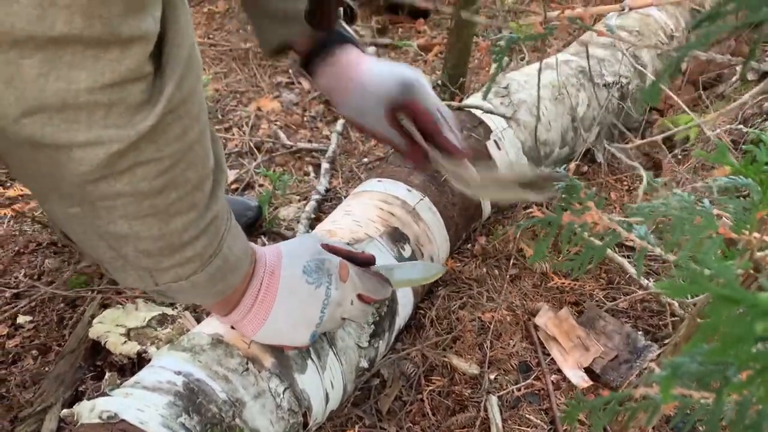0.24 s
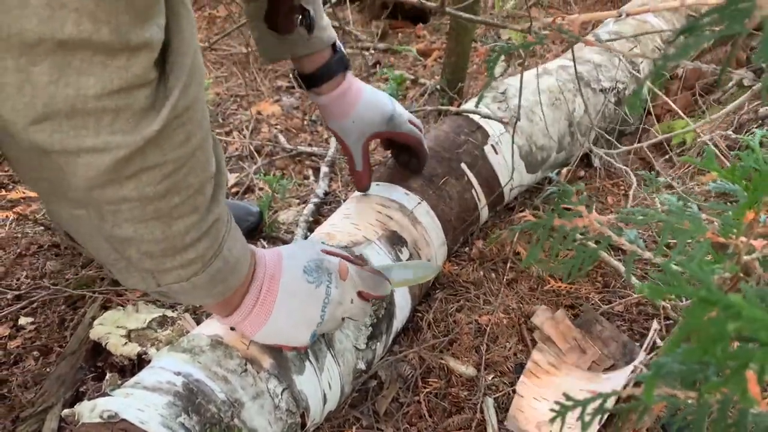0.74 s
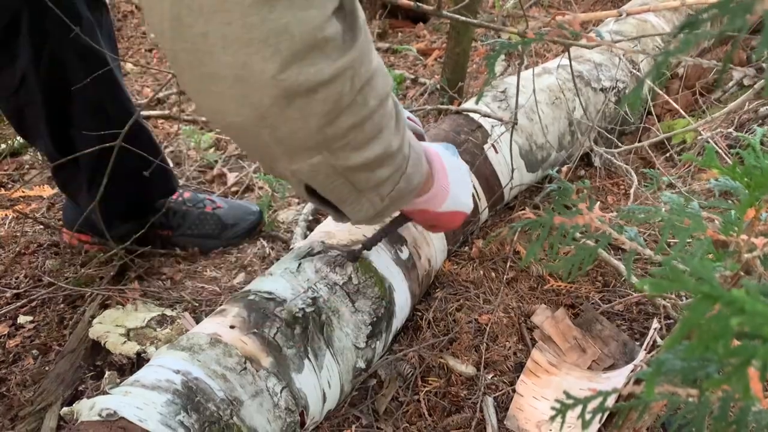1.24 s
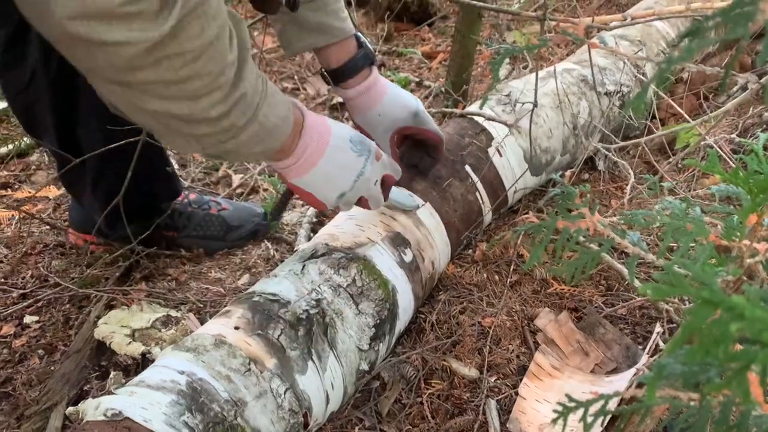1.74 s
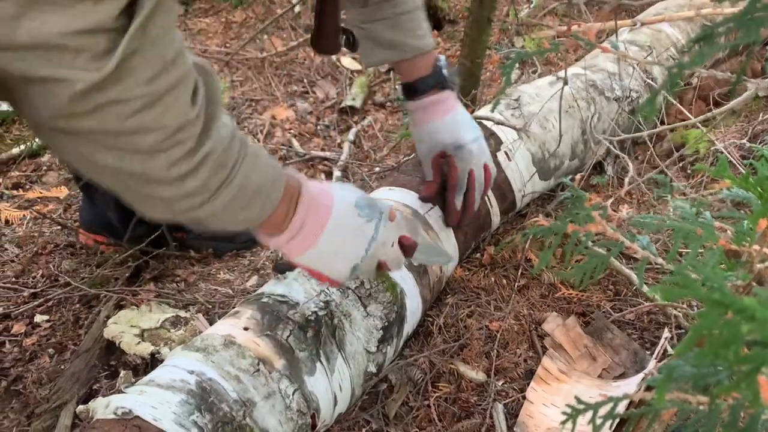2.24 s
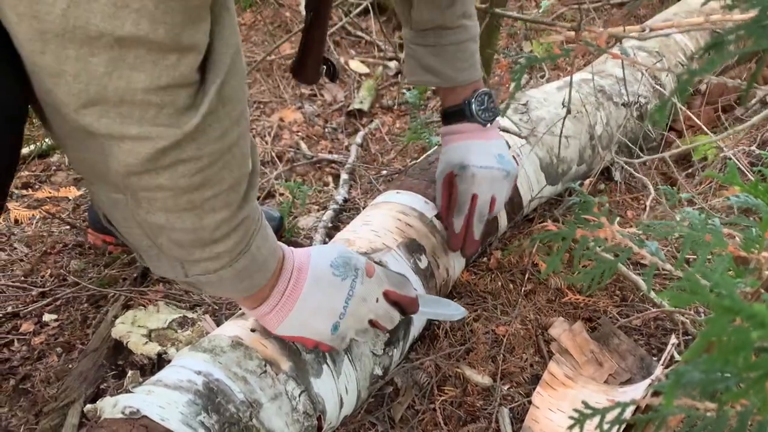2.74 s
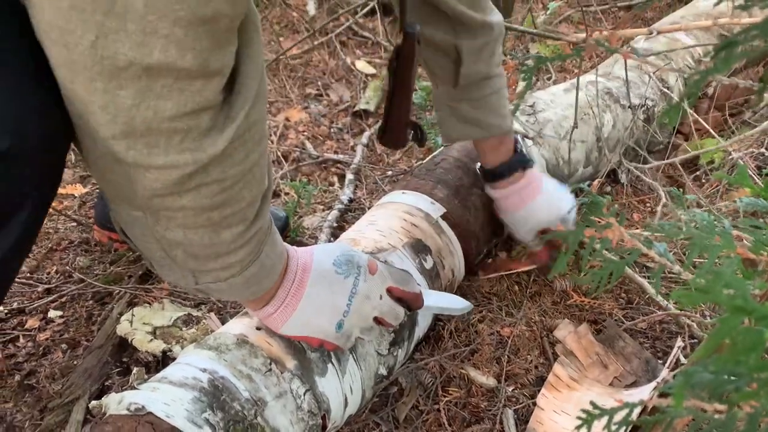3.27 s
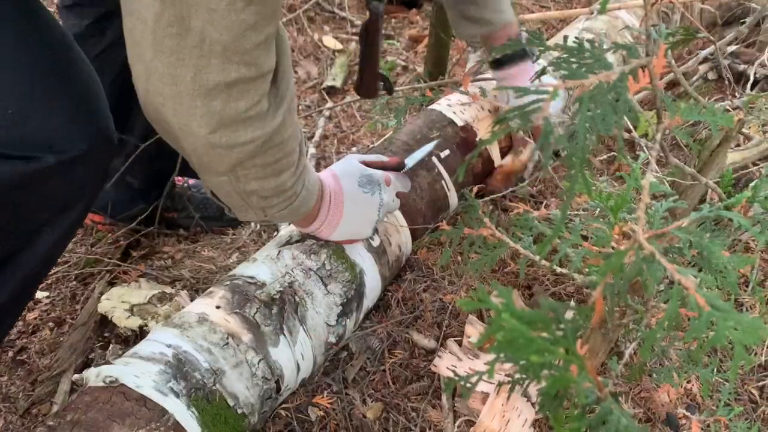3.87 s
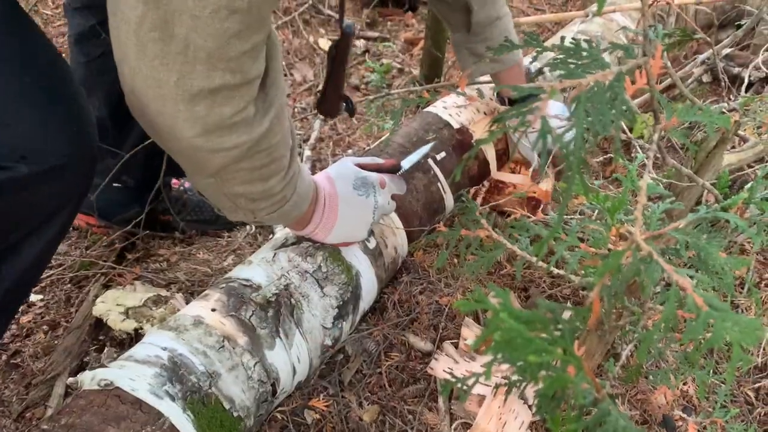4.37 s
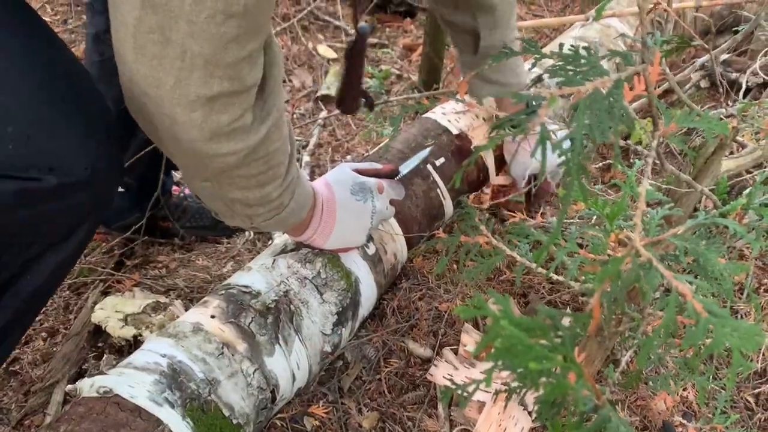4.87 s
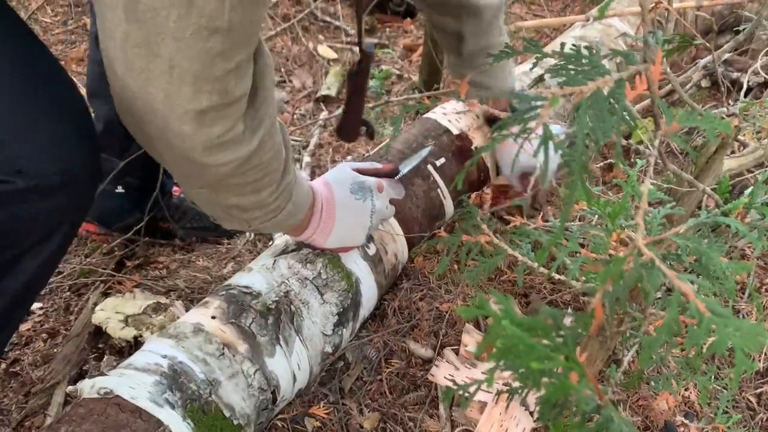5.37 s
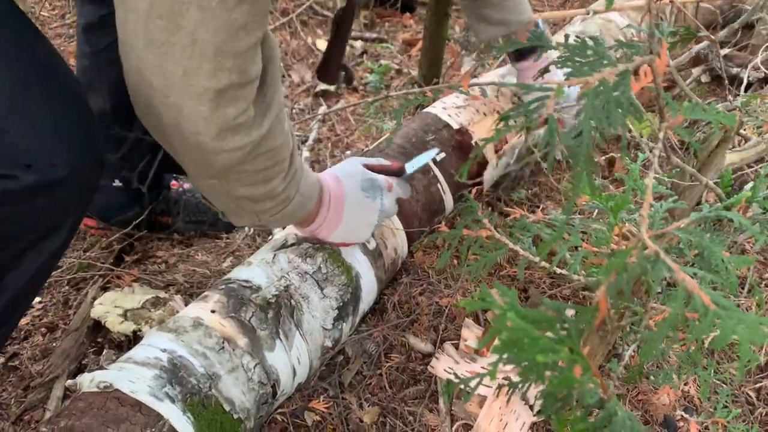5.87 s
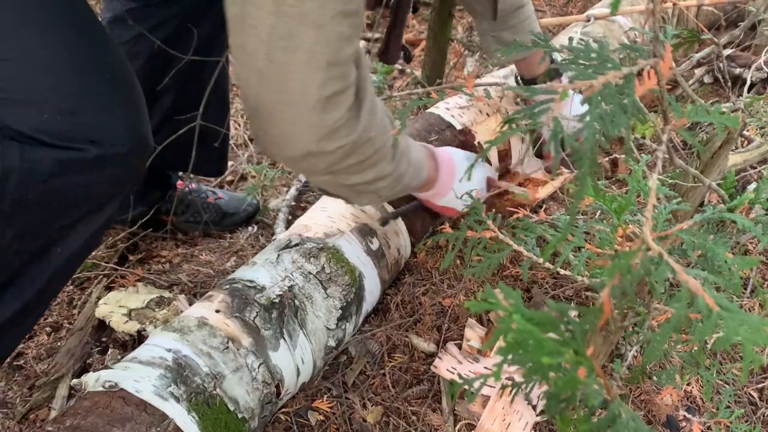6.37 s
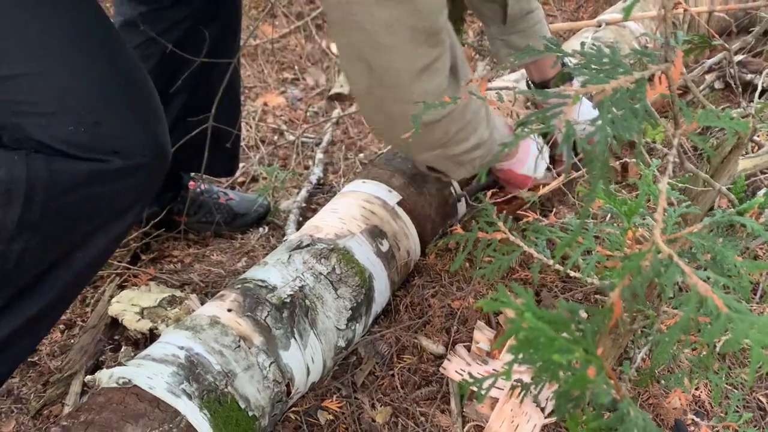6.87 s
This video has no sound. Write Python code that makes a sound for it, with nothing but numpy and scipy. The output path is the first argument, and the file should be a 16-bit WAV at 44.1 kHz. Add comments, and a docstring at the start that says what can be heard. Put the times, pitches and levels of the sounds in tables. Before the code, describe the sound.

Close up in a quiet forest, dry birch bark is cut and stripped from a log by hand. Brief blade scrapes and scattered clicks come first, separated by pauses. The peeling then grows busier, with bright crackling, splintering snaps and dull wooden knocks as the log is tugged. After a short lull come three last loud rips. Wind is barely audible underneath, and there is almost no echo.

```python
"""Gloved hands cut birch bark with a knife and peel it from a fallen log in a quiet forest.
First come short scrapes and sparse snaps, with a sharp crack near 1.9 s. Rubbing and tearing crackle;
each snapping fibre sends a falling chirp through the curled sheet and thumps the log. From 3.8 to
5.5 s the snaps crowd together and hard tugs rock the log. The last strong bursts come near 6.2, 6.5
and 7 s. Faint wind lies under it all, and the recorder adds its own stereo colouring."""
import sys
import numpy as np
from scipy import signal
from scipy.fft import rfft, irfft, next_fast_len
from scipy.io import wavfile
from scipy.ndimage import uniform_filter1d, map_coordinates

SR = 44100
rng = np.random.default_rng(int(sys.argv[2]) if len(sys.argv) > 2 else 0)


def bounce(signal):
    """Save signal as a 16-bit WAV file at the path given by the first command-line argument."""
    frames = np.transpose(np.atleast_2d(signal))
    limited = np.clip(frames, -1, 1)
    pcm = np.round(limited * 32767).astype(np.int16)
    wavfile.write(sys.argv[1], SR, pcm)


N = 313992

# Pulls and scrapes of blade and gloves, before each layer's own trim:
# (start [s], length [s], crackle [dB], rustle over crackle [dB], scrape over crackle [dB])
PULLS = [(.09, 0.11, -45.5, -9, -2.5), (0.391, 0.046, -47, -4, 7), (.842, 0.024, -48, -6.5, -5),
         (.895, 0.0094, -54, -12, -11), (1.0, 0.11, -72, -4, 1), (1.329, 0.11, -77, 8.5, 11.5),
         (1.553, 0.0036, -60.5, -7.5, -9), (1.798, 0.1, -61.5, 7, 8), (2.11, 0.029, -61.5, -6.5, 1),
         (2.265, 0.055, -57, -6, -3), (2.38, 0.046, -59, -5.5, -2), (2.47, .015, -46, -16.5, -12),
         (2.74, 0.074, -64.5, -2.5, 2.5), (2.986, .075, -57, -6.5, 7), (3.078, 0.071, -54.5, -7.5, -2.5),
         (3.234, 0.049, -49.5, -8, -8.5), (3.338, 0.066, -50, -7.5, -6), (3.631, 0.065, -59.5, -6, -0.5),
         (3.781, .19, -45, -14.5, -8.5), (3.817, 0.014, -38.5, -4.5, -1), (3.987, 0.011, -40.5, -13, -10),
         (4.024, 0.051, -50, 0, -8), (4.1, 0.13, -59, -10, -21), (4.335, 0.059, -59, 4, -10),
         (4.428, 0.076, -47.5, -5, -8), (4.54, 0.062, -53.5, -7.5, -5), (4.773, 0.094, -44.5, -1, -3),
         (4.987, 0.12, -54, -4.5, -6.5), (5.172, 0.091, -50, 1, -4.5), (5.358, 0.049, -46, 1, -3.5),
         (5.664, .145, -49.5, -7.5, -6.5), (5.898, 0.018, -47.5, -5.5, -1), (5.999, .02, -51, -6.5, 2),
         (6.095, 0.014, -57, -3.5, -2), (6.217, 0.024, -40.5, -8.5, -6), (6.359, 0.11, -64.5, -3.5, 4),
         (6.471, 0.079, -48.5, -1, -5.5), (6.89, 0.097, -61.5, -5.5, -12), (7.004, 0.065, -45, -8.5, -6.5)]
# Gloves and sleeves shifting on the bark between strokes: (time [s], crackle [dB])
GLOVE_LEVELS = [(0, -51), (.3, -57.5), (.5, -59.5), (.68, -75.5), (.81, -59), (.96, -79), (1.25, -92),
                (1.45, -72), (1.75, -73), (1.95, -62), (2.6, -64), (2.92, -77.5), (3.2, -58), (3.55, -66.5),
                (4.7, -65), (5.9, -58.5), (6.75, -73.5), (7.12, -58)]
# Tone of the tearing papery layers: (frequency [Hz], level [dB])
CRACKLE_TONE = [(2500, -46.5), (5000, -1), (6400, -3), (8500, 2), (10500, 0), (13500, -1), (15500, -3.5),
                (17000, -19.5)]
# Tone of the hollow sheet: (frequency [Hz], level [dB])
RUSTLE_TONE = [(40, -34.5), (100, -13.5), (250, -7), (380, 1.5), (700, 0), (1150, -2), (1600, -10),
               (2600, -35), (5000, -59)]
# Tone of the scraped surface: (frequency [Hz], level [dB])
SCRAPE_TONE = [(700, -25.5), (1400, -2.5), (1900, 1), (2700, 0), (3600, 1), (5500, -8.5), (7500, -20),
               (12000, -45.5)]
# Fibres breaking: (time [s], crack [dB], splinter [dB], sheet pitch [Hz], sheet [dB])
FIBRE_BREAKS = [(.238, -41.5, -51, 1220, -66), (.253, -45.5, -65, 1260, -75), (0.384, -41, -45, 1550, -63),
                (.4684, -45.5, -39, 1400, -42.5), (.6455, -63, -68, 1200, -83),
                (.8533, -35.5, -52, 775, -51.5), (0.8701, -38.5, -48.5, 1150, -44),
                (.9722, -62, -73, 1200, -78), (1.3368, -66, -50.5, 1220, -50), (1.429, -75, -66, 1010, -65),
                (1.558, -49, -49.5, 1240, -51), (1.8479, -45, -44, 970, -58), (1.8812, -47, -44, 1050, -45),
                (1.8844, -27, -25.5, 787, -36), (1.9702, -65.5, -66, 785, -57),
                (2.1763, -73.5, -71, 770, -60), (2.245, -49, -67, 1370, -72),
                (2.2841, -38.5, -61, 1050, -66), (2.302, -55.5, -72, 810, -54.5),
                (2.3857, -45, -63, 960, -66), (2.3914, -37, -50, 1130, -48.5),
                (2.4696, -38, -53, 1000, -65), (2.474, -46, -45.5, 920, -55),
                (2.5253, -50.5, -59.5, 1120, -68), (2.6807, -56, -63.5, 1010, -51.5),
                (3.117, -49.5, -51.5, 870, -69), (3.1442, -56, -53, 1400, -57),
                (3.1946, -42, -55.5, 910, -70), (3.211, -31, -42, 1270, -50.5), (3.239, -38, -48, 900, -58),
                (3.2536, -36, -47, 855, -57), (3.325, -48, -52, 1200, -59.5),
                (3.398, -49, -52.5, 1230, -74), (3.8253, -36, -45.5, 1150, -38.5),
                (3.8325, -33, -43, 1060, -40.5), (3.9159, -35.5, -44, 1520, -61),
                (3.9951, -35.5, -45, 705, -48), (4.0022, -34, -42, 765, -49), (4.02, -32, -37, 970, -34.5),
                (4.0671, -42.5, -49.5, 910, -37), (4.1642, -29.5, -42, 1170, -44.5),
                (4.183, -43.5, -54, 820, -59), (4.2127, -42.5, -53, 1130, -54.5),
                (4.227, -29.5, -44.5, 830, -51.5), (4.2978, -41, -54, 810, -45.5),
                (4.4284, -43, -48, 880, -47), (4.4641, -38.5, -37.5, 870, -41.5),
                (4.5401, -44.5, -46, 1090, -58), (4.6573, -58.5, -54, 1240, -54.5),
                (4.784, -28.5, -42.5, 825, -44.5), (4.7889, -39.5, -40.5, 1100, -39),
                (4.8003, -29.5, -42, 1140, -37), (4.8301, -36.5, -49, 1030, -47),
                (4.841, -40.5, -60, 1050, -46), (4.8517, -35, -44, 1080, -39.5),
                (4.8718, -46, -52.5, 990, -40.5), (4.9021, -40, -54, 1006, -47.5),
                (4.9727, -47, -63, 1080, -61), (4.9956, -41, -49.5, 1150, -44),
                (5.0409, -42.5, -50.5, 980, -45), (5.0539, -35, -51.5, 1200, -51),
                (5.0566, -28.5, -50, 1160, -32.5), (5.0672, -23.5, -37.5, 1080, -40),
                (5.08, -34.5, -49, 1480, -40.5), (5.1629, -42, -67, 970, -55), (5.184, -45, -60, 740, -41),
                (5.268, -44, -51, 990, -41.5), (5.3496, -45, -60, 825, -48), (5.3802, -42, -44.5, 800, -42),
                (5.3907, -35.5, -42, 1010, -40), (5.5285, -48, -49, 790, -50),
                (5.9119, -44.5, -45.5, 1040, -43), (5.955, -43.5, -47, 1180, -55.5),
                (6.1755, -40, -46, 1670, -38.5), (6.21, -41, -42, 1160, -49),
                (6.2253, -27, -30.5, 1100, -28.5), (6.246, -37.5, -41, 840, -41),
                (6.332, -37.5, -44.5, 786, -39), (6.3575, -44.5, -60, 850, -64),
                (6.458, -31, -43, 1220, -46), (6.4729, -37.5, -51.5, 810, -47),
                (6.5008, -49, -42, 1050, -46.5), (6.5106, -33, -48.5, 890, -53),
                (6.5142, -40.5, -43.5, 820, -41), (6.5277, -30, -36, 800, -46.5),
                (6.5455, -45.5, -48, 990, -51), (6.6621, -50.5, -54.5, 970, -49),
                (7.0, -42.5, -53, 1066, -65), (7.014, -28, -43, 1050, -54), (7.0287, -24, -34, 1020, -35.5),
                (7.0691, -38, -39, 680, -43.5)]
# An edge juddering over the bark: (middle [s], half length [s], pitch [Hz], ring [dB], crackle [dB])
JUDDERS = [(0.108, 0.0031, 2620, -30.5, -37), (0.137, 0.0059, 2580, -39.5, -43),
           (0.161, 0.024, 2580, -48.5, -44.5), (0.215, 0.0066, 3030, -45, -35.5),
           (0.6, 0.14, 3850, -67, -94), (1.39, 0.085, 2740, -72, -84), (1.808, 0.017, 2890, -49.5, -77),
           (1.843, 0.027, 2030, -51, -57.5), (1.854, .015, 2530, -44.5, -48.5),
           (3.026, 0.022, 1970, -46.5, -51), (3.825, .012, 1920, -41.5, -48.5),
           (6.014, .006, 3100, -48.5, -60.5)]
# Hand and knife bumping the log: (time [s], knock [dB], thud [dB])
LOG_BUMPS = [(.3835, -58, -53), (0.4678, -42.5, -46), (1.3372, -50, -62.5), (1.8842, -40, -46),
             (1.9695, -58.5, -65), (2.3026, -57, -70), (2.3914, -55.5, -64), (3.2535, -44.5, -49.5),
             (3.325, -59, -55), (3.3638, -60, -52.5), (3.8248, -42, -62), (4.0669, -47, -44),
             (4.2981, -49.5, -47), (4.4268, -44.5, -44), (4.466, -33.5, -38.5), (4.7887, -41.5, -60),
             (4.8519, -46.5, -64), (5.0666, -37, -47.5), (5.184, -48, -74), (5.3808, -32, -46),
             (5.3917, -43, -38.5), (5.5289, -54, -61), (6.246, -54, -61), (6.3319, -44, -53),
             (6.458, -40.5, -53), (6.5016, -45, -49), (6.6626, -47.5, -53.5), (7.0365, -35.5, -45.5),
             (7.0687, -44, -52)]
# Tone of the log thudding on soft ground: (frequency [Hz], level [dB])
THUD_TONE = [(20, -45.5), (32, -29), (50, -9.5), (80, -7), (130, 1.5), (220, -1.5), (330, -7.5), (700, -47)]
# Hard tugs that rock the whole log: (time [s], pitch [Hz], level [dB])
TUGS = [(0.483, 72, -49), (1.892, 79.5, -77), (3.26, 88, -47), (3.38, 67, -42), (4.317, 108, -50),
        (4.473, 103, -49), (5.074, 84.6, -39), (5.406, 84, -33.5)]
# Echo among the trees: (frequency [Hz], time to fade by 60 dB [s])
ECHO_TIMES = [(100, 0.16), (1000, 0.17), (3500, 0.18), (8000, 0.12), (16000, .12)]
# Tone of the far wind: (frequency [Hz], level [dB])
WIND_TONE = [(20, -23), (40, -10), (65, 1), (120, -6), (300, -11), (1000, -14.5), (2500, -14),
             (6000, -19.5), (16000, -30.5)]
# The recorder's stereo colouring, in phase: (frequency [Hz], left minus right [radians])
STEREO_PHASE = [(0, 0.4), (400, -0.05), (1100, 0.5), (1850, -1.5), (2760, 2.03), (4400, 0.33), (5300, 2.5),
                (6000, 0.62), (7000, 0.3), (8000, -1.94), (8700, -2.5), (10300, -7), (11900, -10),
                (13400, -12), (15100, -17), (16500, -17)]
# The recorder's stereo colouring, in level: (frequency [Hz], left minus right [dB])
STEREO_LEVEL = [(500, 0), (1500, 2.5), (3000, 0), (4400, 1.9), (6000, -4.5), (7000, -1.5), (7800, 0.5),
                (9500, 0)]

LOW_CUT_HZ, TOP_HZ = 28, 15900
TREBLE_APART = .16  # share of the crackle's noise power that left and right do not have in common


def strokes():
    """Blade and gloves scrape the bark; its layers tear and the loose sheet rustles."""
    grip_db = 2.67 * wobble(70)  # sticking and slipping shakes all layers together
    crackle_db, rustle_db, scrape_db = grip_db + stroke_levels()
    rustle = amp(rustle_db - 2) * fibres(RUSTLE_TONE, per_s=630, spread_db=3.5, friction=.96, apart=.083)
    scrape = amp(scrape_db - 1.5) * fibres(SCRAPE_TONE, per_s=1600, spread_db=3.5, apart=.65)
    crackle = amp(crackle_db - .15) * fibres(CRACKLE_TONE, per_s=2000, spread_db=5.5)
    tearing = np.clip((rustle_db + 65.5) / 16, 0, 1)  # only a firm pull breaks splinters loose
    woody = tearing * amp(rustle_db - 4) * splinters()
    return rustle + scrape + crackle + woody


def stroke_levels(grab_db_per_s=746, let_go_db_per_s=504.5, settle_db_per_s=147):
    """Crackle, rustle and scrape in dB: each stroke grabs, holds and lets go over quiet handling."""
    t = np.linspace(0, N / SR, 4000)
    handling_db = np.interp(t, *np.transpose(GLOVE_LEVELS))
    power = amp(handling_db + np.c_[[0, -9.5, -3.5]]) ** 2  # rows: crackle, rustle, scrape
    for start, length, db, rustle_db, scrape_db in PULLS:
        early, late = np.maximum(start - t, 0), np.maximum(t - start - length, 0)
        settle_db = -10.5 - settle_db_per_s * late  # the bent bark creaks on after it is let go
        effort_db = np.maximum(-let_go_db_per_s * late, settle_db) - grab_db_per_s * early
        power += amp(db + effort_db + np.c_[[0, rustle_db, scrape_db]]) ** 2
    return [np.interp(np.arange(N) / SR, t, 10 * np.log10(layer)) for layer in power]


def fibres(tone, per_s, spread_db, friction=1, patchy_db=4, apart=TREBLE_APART):
    """Tiny breaks of uneven size over smooth rubbing, in stereo at a steady level of 1."""
    happens = rng.random(N) < per_s / SR
    breaks = happens * amp(spread_db * np.minimum(rng.exponential(size=N), 4))
    force = patchy((unit(breaks) + friction) * stereo_noise(N, apart), patchy_db)
    sound = filtered(force, lambda hz: amp(along(tone, hz)) * bending(hz, travel_s=.001018))
    power = uniform_filter1d(np.mean(sound ** 2, axis=0), size=2600)
    return sound / np.sqrt(np.abs(power) + 1e-12)


def splinters(per_s=240, pitch_hz=1700, spread_octaves=1.5, fade_cycles=1.8, spread_db=4, size=512):
    """Woody grains: each tiny splinter rings for a few cycles at its own pitch."""
    when, pitch, strength = rng.random((int(per_s * N / SR), 3)).T
    hz = pitch_hz * 2 ** (spread_octaves * (2 * pitch[:, None] - 1))
    cycles = hz * np.arange(size) / SR
    gain = amp(spread_db * np.minimum(-np.log(1 - strength[:, None]), 3))
    grains = gain * np.exp(-cycles / fade_cycles) * np.sin(2 * np.pi * cycles)
    index = (when * N).astype(int)[:, None] + np.arange(size)
    return unit(np.bincount(index.ravel(), grains.ravel(), N + size)[:N])  # add up all the grains


def snaps(size=12288):
    """Each break cracks, rings a splinter, chirps through the sheet and faintly shakes the log."""
    out, t, hz = np.zeros((2, N + size)), np.arange(size) / SR, np.fft.rfftfreq(size, 1 / SR)
    crisp, heavy = tone_filter(CRACKLE_TONE, hz), tone_filter(THUD_TONE, hz)
    for time, crack_db, splinter_db, sheet_hz, sheet_db in FIBRE_BREAKS:
        chirp = falling_chirp(hz)
        colour = shard_tone(hz)
        crack = colour * crisp
        crack = crack * fracture(t, fade_s=.002, chatter_db=-11.5, chatter_s=.014, apart=TREBLE_APART)
        # a drier crack comes from a thinner, higher splinter
        splinter_hz = 2845 * 2 ** ((crack_db - splinter_db) / 42.5)
        splinter = colour * resonance(hz, splinter_hz, q=1.3) ** 2
        splinter = splinter * fracture(t, fade_s=.0029, chatter_db=-13, chatter_s=.028, apart=.44)
        sheet = resonance(hz, sheet_hz, q=3.6) * resonance(hz, sheet_hz, q=1)
        sheet *= chirp * (1 + .6 * scatter(t, fade_s=.016))
        bark = at_level(crack, crack_db) + at_level(splinter, splinter_db) + at_level(sheet, sheet_db)
        thump = log_thump(t, chirp, heavy, knock_db=sheet_db - 14, thud_db=sheet_db - 30)
        add(out, time, bark + thump)
    return out[:, :N]


def fracture(t, fade_s, chatter_db, chatter_s, apart):
    """Spectrum of one break: fibres start to give, let go at once, then chatter away."""
    before = t[::-1]  # add() moves the end of this sound to just before the break
    release = amp(-60 * t / fade_s) + amp(-60 * before / .0015) + amp(-34.5 - 60 * before / .018)
    chatter = amp(chatter_db - 60 * t / chatter_s)
    return rfft(release * stereo_noise(len(t), apart / 2) + chatter * stereo_noise(len(t), apart))


def shard_tone(hz, depth_db=2.4, count=22):
    """Every broken piece has its own uneven tone."""
    bands_hz = np.geomspace(1000, TOP_HZ, count)
    return tone_filter(np.column_stack([bands_hz, depth_db * rng.standard_normal(count)]), hz)


def falling_chirp(hz):
    """The chirp of a bending wave; each one travels its own distance."""
    return bending(hz, travel_s=.000851 * np.exp(.25 * rng.standard_normal()))


def bending(hz, travel_s):
    """Low notes travel more slowly through a bending sheet; travel_s is the delay near 1 kHz."""
    delay = travel_s * (1000 / (hz + 30)) ** .856
    return np.exp(-2j * np.pi * np.cumsum(delay) * hz[1])


def rasps():
    """Quick slips make the bark ring at one pitch, with a spray of fine crackle."""
    out, t = np.zeros((2, N)), np.arange(N) / SR
    spray = fibres(CRACKLE_TONE, per_s=3100, spread_db=8.5, friction=.7, patchy_db=3.5)
    slips = stereo_noise(N, apart=.7) * amp(2 * wobble(500))
    for middle, half_length, pitch, ring_db, crackle_db in JUDDERS:
        ring = filtered(slips, lambda hz: resonance(hz, pitch, q=6.4) * resonance(hz, pitch, q=.93))
        swell = np.exp(-((t - middle) / half_length) ** 2)
        out += swell * (amp(ring_db) * unit(ring) + amp(crackle_db) * spray)
    return out


def bumps(size=12288):
    """Hand and knife send dull blows straight into the log."""
    out, t, hz = np.zeros((2, N + size)), np.arange(size) / SR, np.fft.rfftfreq(size, 1 / SR)
    heavy = tone_filter(THUD_TONE, hz)
    for time, knock_db, thud_db in LOG_BUMPS:
        add(out, time, log_thump(t, falling_chirp(hz), heavy, knock_db, thud_db))
    return out[:, :N]


def log_thump(t, chirp, heavy, knock_db, thud_db):
    """The wood knocks and the log thuds on the soft ground."""
    hz = np.fft.rfftfreq(len(t), 1 / SR)
    wood = resonance(hz, 404, q=1.86) * resonance(hz, 540, q=1.15)
    knock = wood * chirp * (1 + .77 * scatter(t, fade_s=.029))
    thud = heavy * chirp * (1 + .72 * scatter(t, fade_s=.13))
    return at_level(knock, knock_db) + at_level(thud, thud_db)


def rocking(rise_s=.011, fade_s=.17):
    """A tug makes the log swing briefly at its lowest note."""
    out, t = np.zeros(N + SR), np.arange(SR // 2) / SR
    for time, hz, db in TUGS:
        swell = amp(db - 60 * t / fade_s) * (1 - np.exp(-t / rise_s))
        out[round(time * SR):][:len(t)] += swell * np.sin(2 * np.pi * hz * t)
    return out[:N]


def tree_echoes(sound):
    """The trees send back a short, blurred echo, different on each side."""
    hz, t, noise = signal.stft(rng.standard_normal((2, SR // 2)), SR, nperseg=128)
    fade = amp(-60 * t / along(ECHO_TIMES, hz)[:, None])
    tail = signal.istft(noise * fade, SR, nperseg=128)[1]
    return signal.fftconvolve(sound, tail / np.linalg.norm(tail[0]), axes=1)[:, :N]


def wind():
    """Faint, steady wind in far trees."""
    return amp(-73) * unit(filtered(stereo_noise(N, apart=.4), lambda hz: amp(along(WIND_TONE, hz))))


def patchy(sound, depth_db):
    """Shifting resonances: random patches of time and pitch get louder or softer."""
    cells = signal.stft(sound, nperseg=512)[2]
    patches = uniform_filter1d(rng.standard_normal(cells.shape[1:]), size=4, axis=0)
    patches = uniform_filter1d(patches, size=7, axis=1)
    return signal.istft(cells * amp(depth_db * unit(patches)), nperseg=512)[1][:, :N]


def scatter(t, fade_s):
    """Spectrum of a noisy ring that drops 60 dB in fade_s."""
    ring = amp(-60 * t / fade_s) * rng.standard_normal(len(t))
    return rfft(ring / np.linalg.norm(ring))


def resonance(hz, pitch_hz, q):
    """A filter that rings at one pitch; a higher q rings longer."""
    damping = 1j * hz * pitch_hz / q
    return damping / (pitch_hz ** 2 - hz ** 2 + damping)


def tone_filter(points, hz):
    """A filter with this (Hz, dB) shape that never sounds before it is struck (minimum phase)."""
    cepstrum = irfft(np.log(amp(along(points, hz))))
    half = len(cepstrum) // 2
    cepstrum[1:half] *= 2
    cepstrum[half + 1:] = 0
    return np.exp(rfft(cepstrum))


def filtered(sound, response):
    """Change the level and phase of each frequency as response(hz) says."""
    size = next_fast_len(N + SR // 2)
    return irfft(rfft(sound, size) * response(np.fft.rfftfreq(size, 1 / SR)), size)[..., :N]


def stereo_noise(length, apart):
    """One shared noise plus one for each side; apart runs from 0 (alike) to 1 (unrelated)."""
    noise = rng.standard_normal((3, length))
    return np.sqrt(1 - apart) * noise[0] + np.sqrt(apart) * noise[1:]


def wobble(per_s):
    """A smooth curve through per_s random points a second."""
    return map_coordinates(rng.standard_normal(int(N * per_s / SR) + 4), [np.arange(N) * per_s / SR])


def add(out, time, sound, lead_samples=400):
    """Mix a sound in at this time, moving its end to the front as a lead-in."""
    start = round(time * SR) - lead_samples
    out[:, start:start + sound.shape[-1]] += np.roll(sound, lead_samples, axis=-1)


def at_level(spectrum, db):
    """Turn a spectrum into a short sound with the energy of 10 ms at this level."""
    sound = irfft(spectrum)
    return amp(db) * unit(sound) * np.sqrt(SR / 100 / sound.shape[-1])


def along(points, hz):
    """Read between (Hz, value) points on a log frequency scale."""
    points_hz, values = np.transpose(points)
    return np.interp(np.log(hz + 1), np.log(points_hz + 1), values)


def amp(db):
    """Turn decibels into a gain."""
    return 10 ** (np.asarray(db) / 20)


def unit(x):
    """Scale to an average (rms) level of 1."""
    return x / np.sqrt(np.mean(x ** 2) + 1e-20)


def scene():
    """The bark and the log, then the trees' weak echo and the wind."""
    work = strokes() + rasps() + snaps() + bumps() + rocking()
    return work + amp(-25) * tree_echoes(work) + wind()


def record(dry):
    """The recorder's stereo colouring: left and right differ in phase and level by frequency."""
    def response(hz):
        sides = np.array([[.5], [-.5]])  # left and right each take half the difference
        colouring = np.exp(1j * along(STEREO_PHASE, hz) * sides) * amp(along(STEREO_LEVEL, hz) * sides)
        low_cut = 1j * hz / (LOW_CUT_HZ + 1j * hz)
        return colouring * low_cut * (hz < TOP_HZ)  # soften deep rumble, cut off the top treble
    return filtered(dry, response)


dry = scene()
out = record(dry)
bounce(out)
```